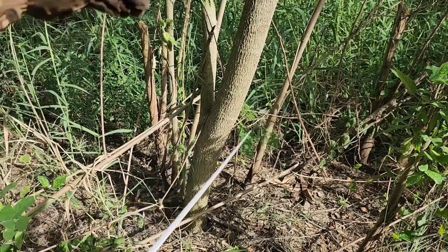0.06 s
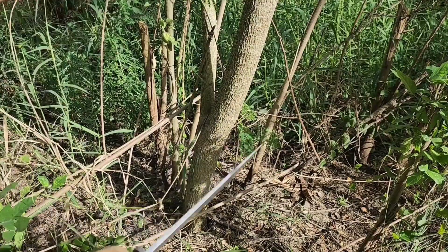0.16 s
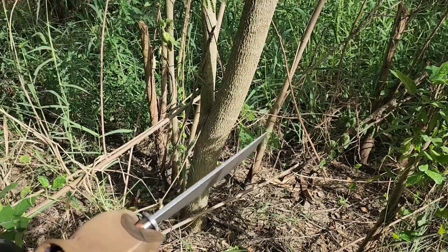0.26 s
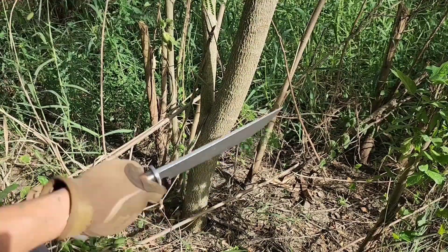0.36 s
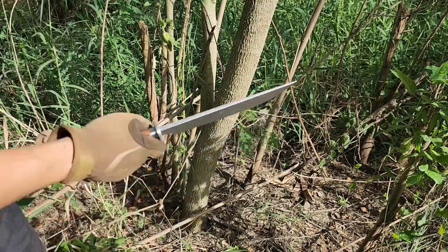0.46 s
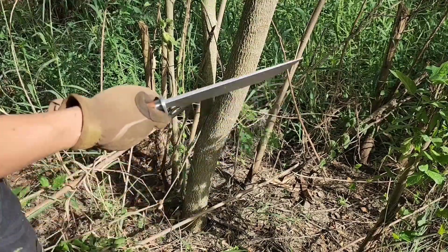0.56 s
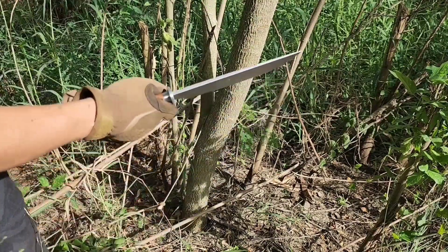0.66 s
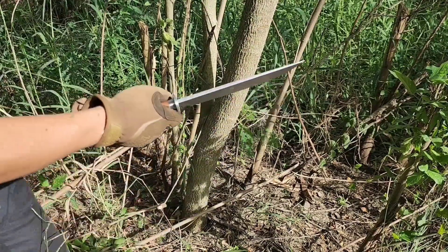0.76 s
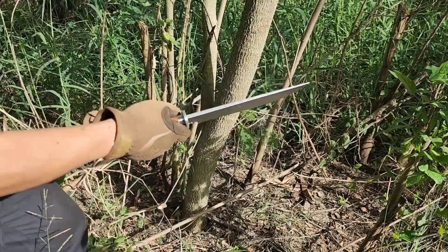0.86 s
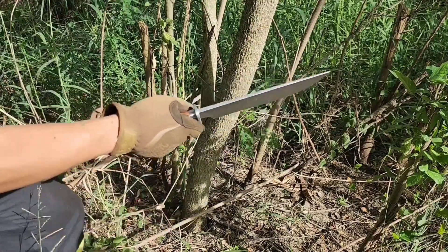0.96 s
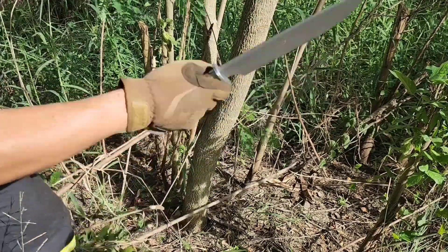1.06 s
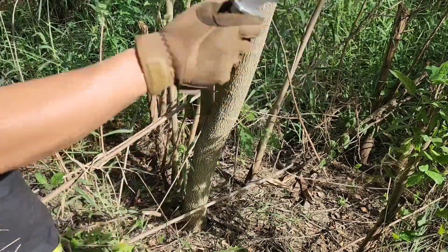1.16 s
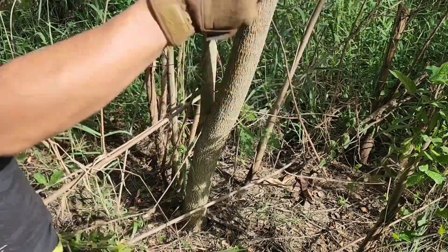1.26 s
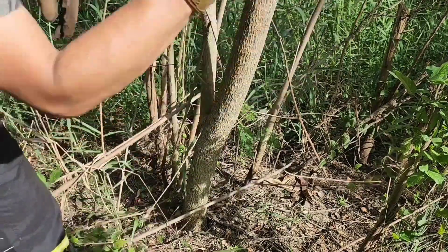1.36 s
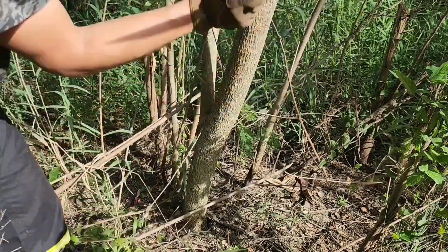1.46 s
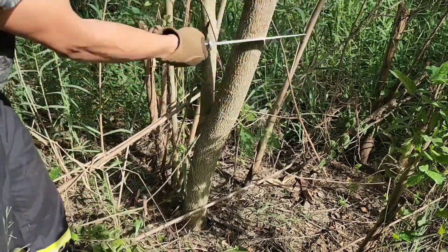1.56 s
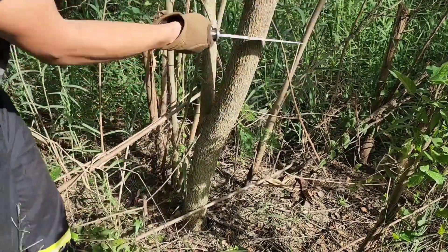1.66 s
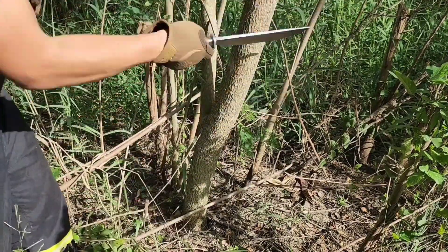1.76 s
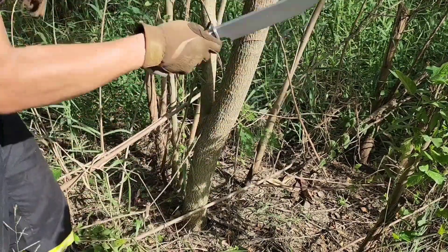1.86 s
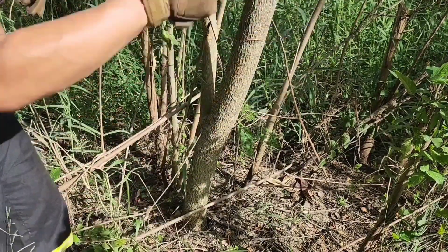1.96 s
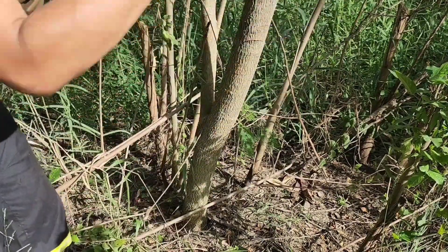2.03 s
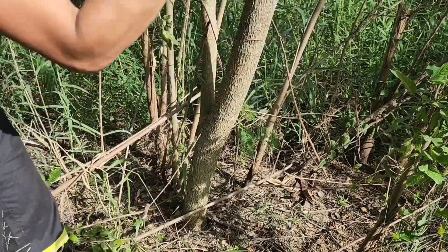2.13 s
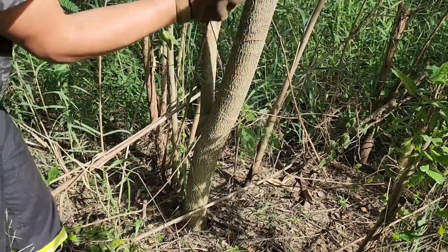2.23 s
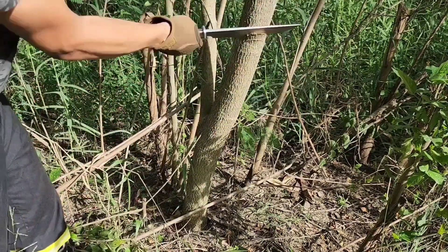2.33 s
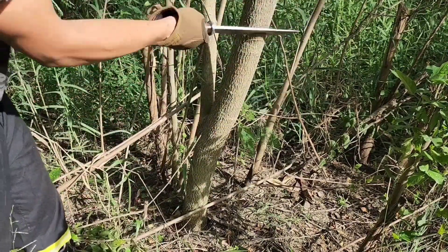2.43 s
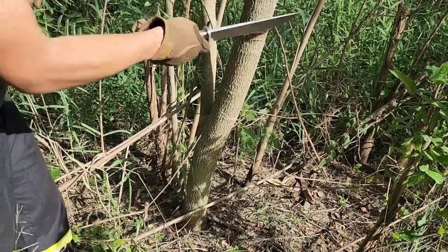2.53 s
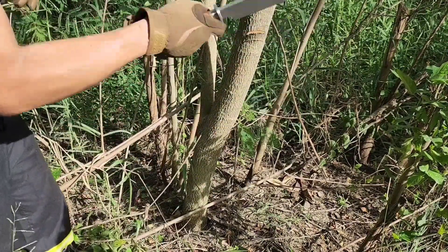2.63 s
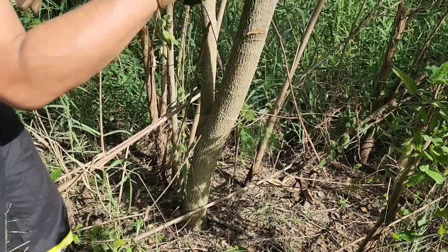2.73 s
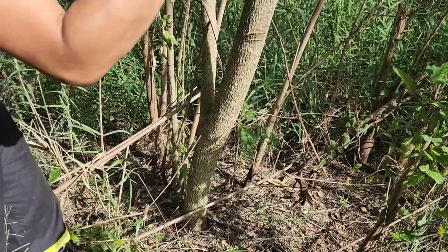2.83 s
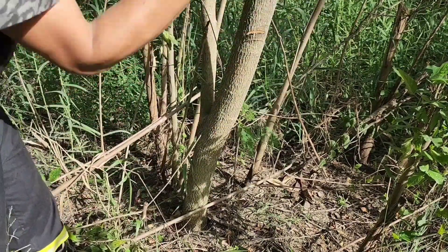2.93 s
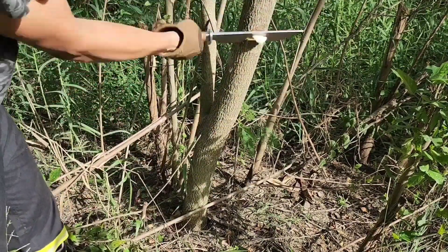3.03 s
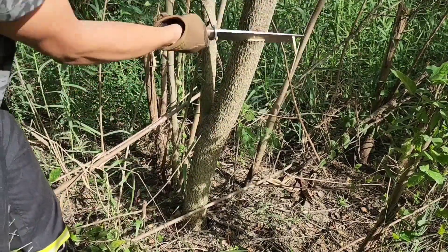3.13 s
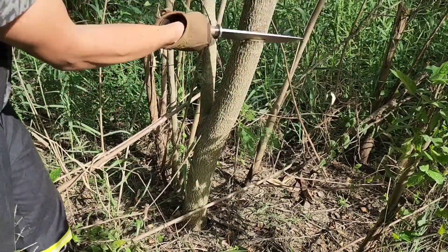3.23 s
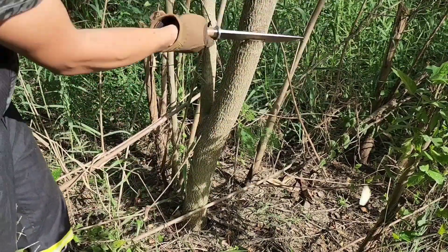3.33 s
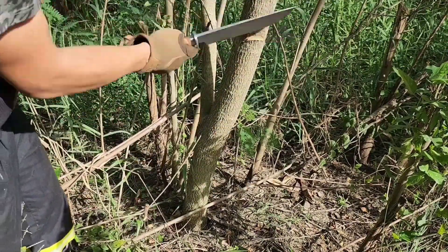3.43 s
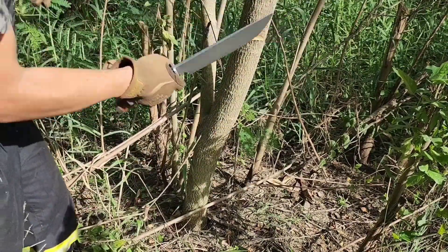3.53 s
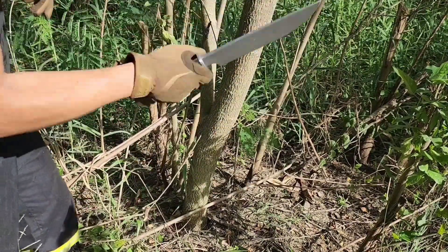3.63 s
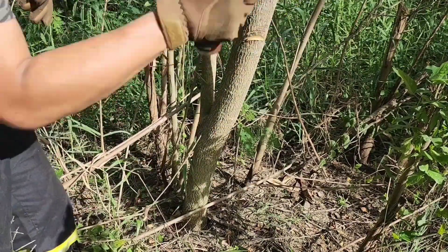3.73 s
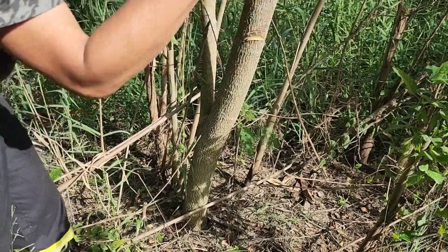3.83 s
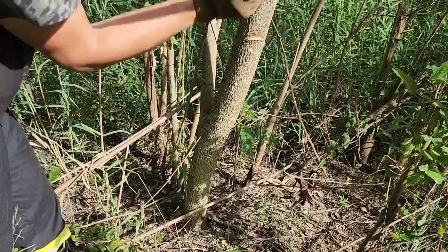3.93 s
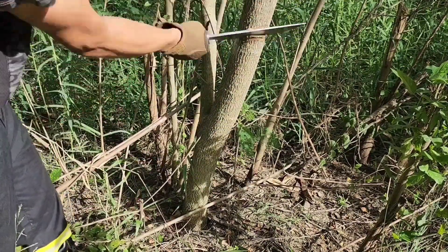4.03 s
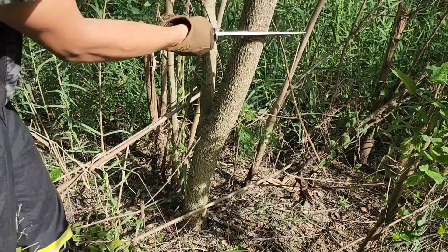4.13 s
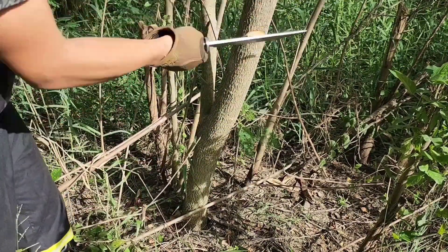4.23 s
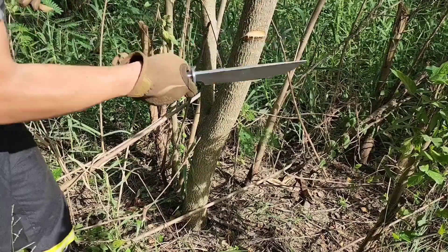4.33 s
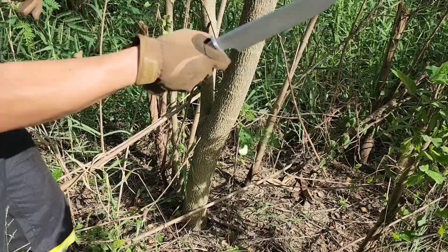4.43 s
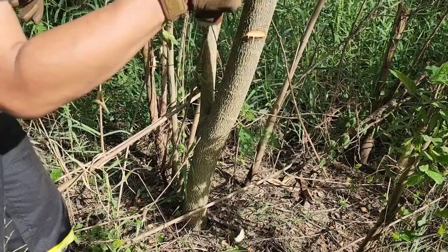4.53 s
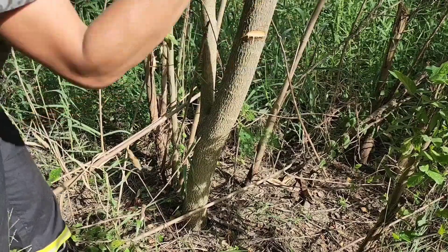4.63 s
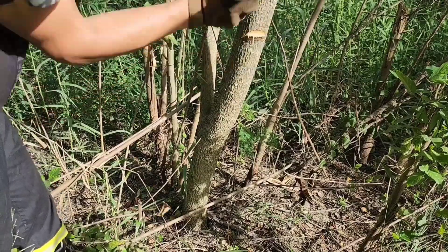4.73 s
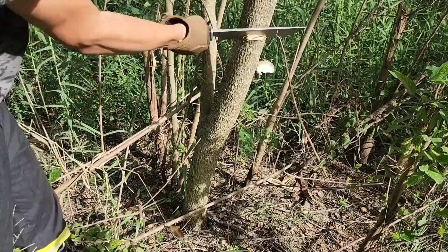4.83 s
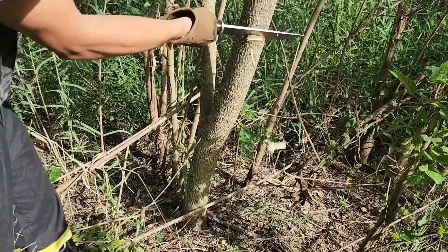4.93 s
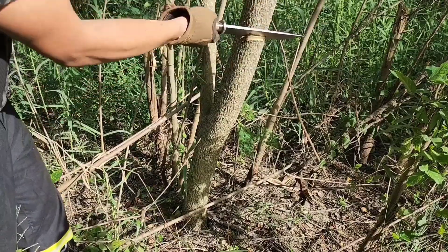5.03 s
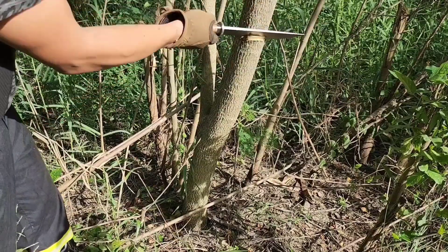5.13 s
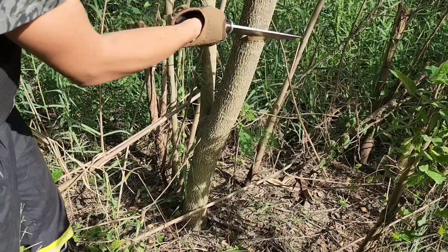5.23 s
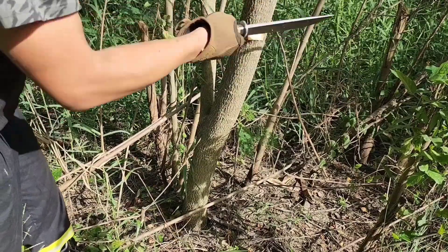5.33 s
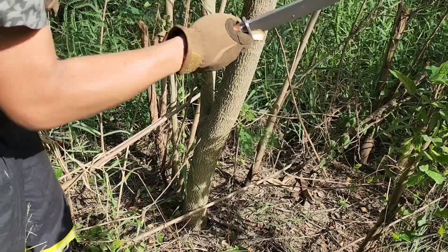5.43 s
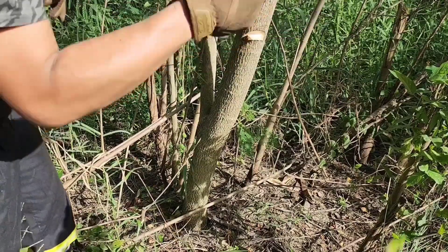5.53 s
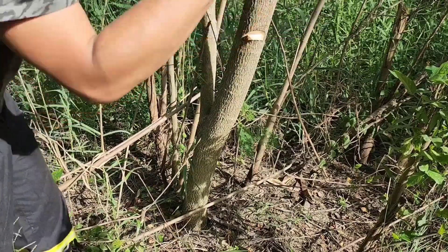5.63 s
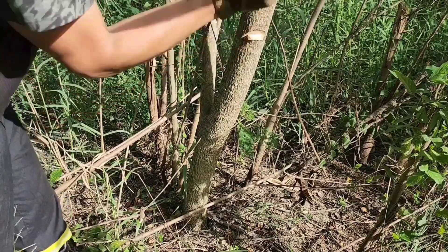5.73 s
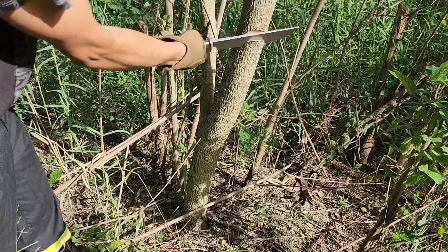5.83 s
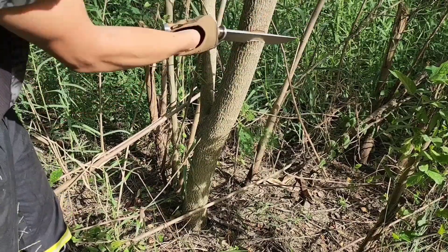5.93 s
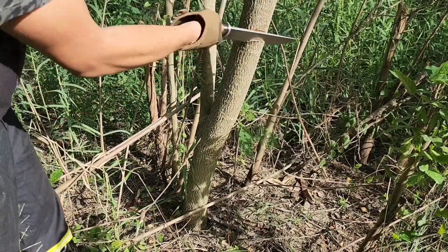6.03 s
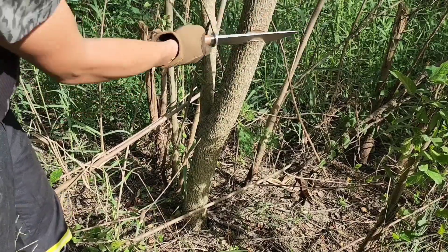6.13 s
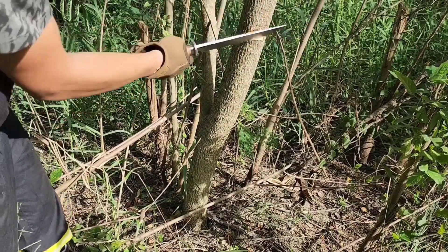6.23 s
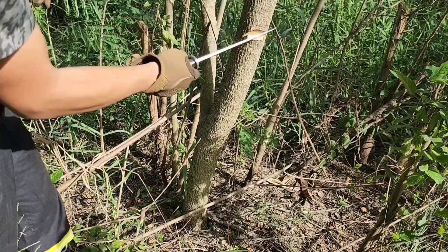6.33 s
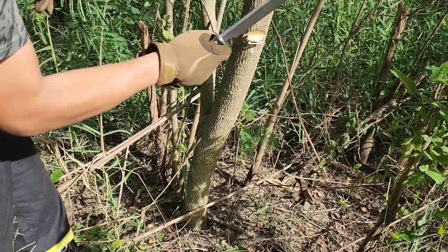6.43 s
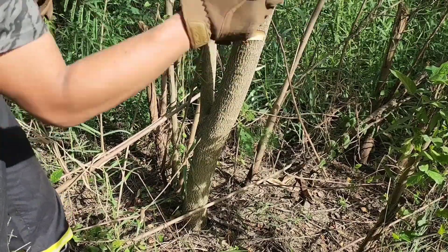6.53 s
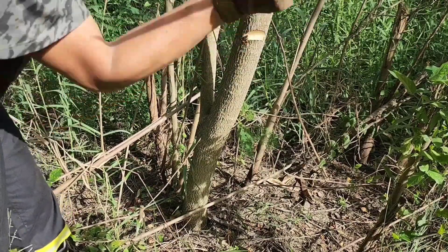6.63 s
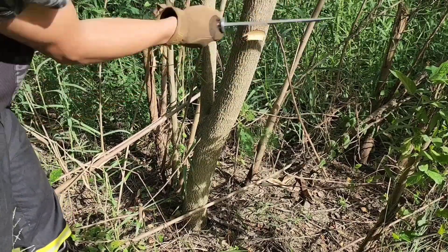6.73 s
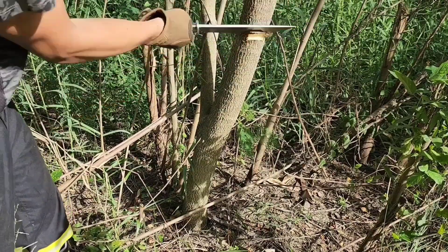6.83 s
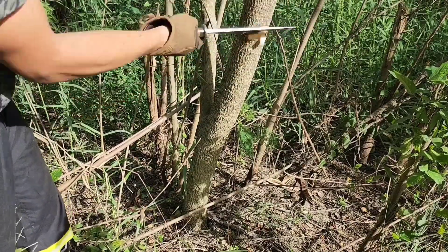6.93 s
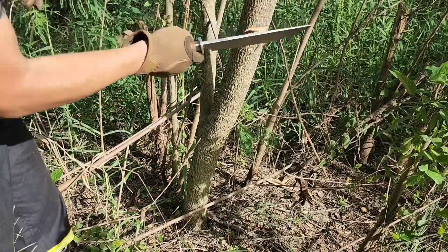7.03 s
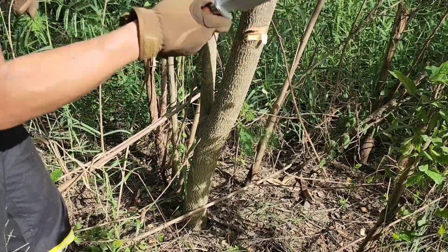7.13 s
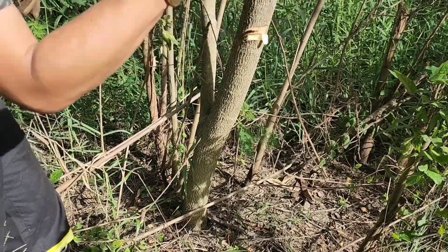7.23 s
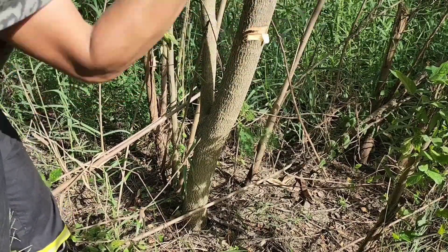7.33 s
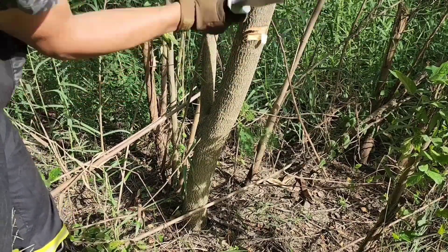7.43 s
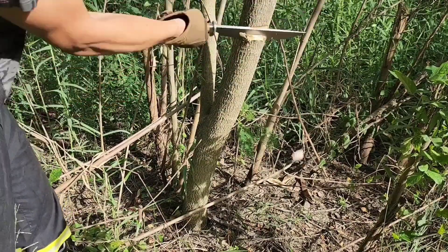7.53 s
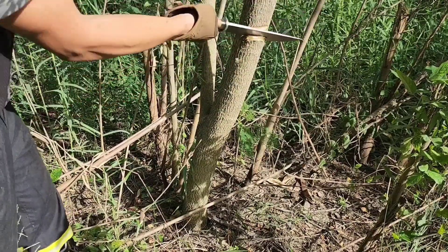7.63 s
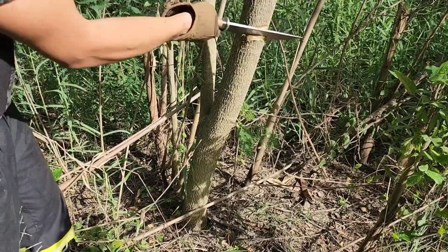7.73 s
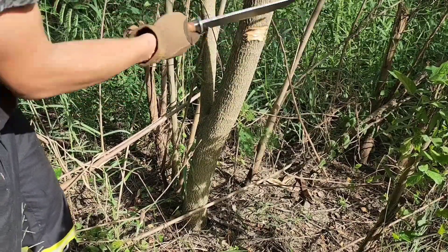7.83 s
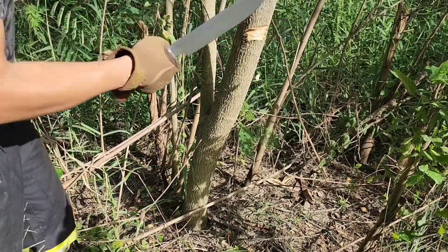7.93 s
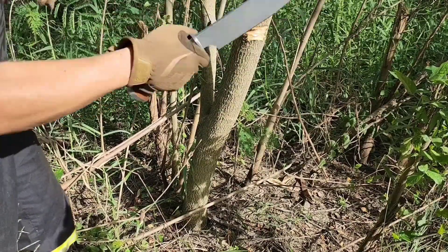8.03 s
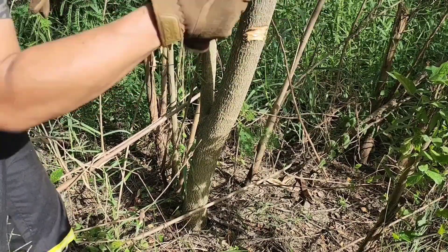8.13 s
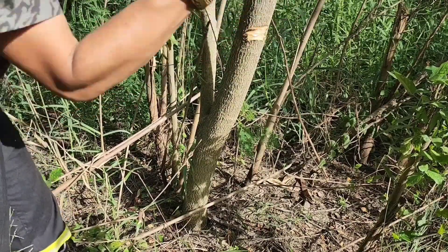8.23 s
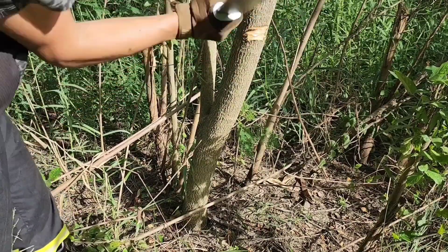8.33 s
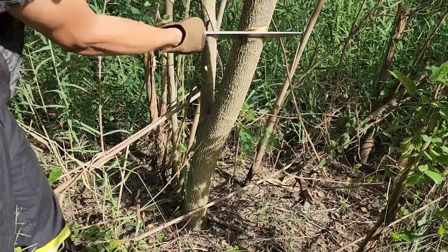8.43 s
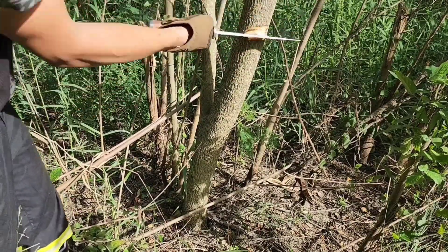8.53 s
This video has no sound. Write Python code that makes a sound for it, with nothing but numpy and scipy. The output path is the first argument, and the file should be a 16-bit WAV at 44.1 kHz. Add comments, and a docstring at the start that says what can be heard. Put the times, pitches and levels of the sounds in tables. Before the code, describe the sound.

In a wooded thicket, heard from about a metre away in stereo, dry leaves and stalks rustle from about 0.3 seconds as a big knife is picked up. Twigs snap at 0.3, 0.9 and 1.5 to 1.65, with tiny creaks. Nine chops into a green trunk follow at about 1.7, 2.5, 3.2, 4.2, 5.0, 6.0, 6.9, 7.7 and 8.6 seconds. The first is duller; the rest crack more brightly. Each is very short: tearing wet fibres, a hard mid-pitched wooden knock, a low stem thump, a trace of damped steel and a quick diffuse echo. Chips tick down between blows, clearest around 4.8 and 5.4, with slight leaf shakes. Quiet small birds give rising chirps and steep falling calls throughout, with occasional thin whistles. Underneath are a low distant engine, weaker from 3.5 to 6.7, faint far whirring, airy hiss and an insect trill.

```python
"""A big knife chops nine times into a green trunk about a metre away: torn fibres, knocking wood, stem thump.
Near sounds are noise bursts and damped modes, scattered by the thicket.
Dry litter rustles first, as the knife is picked up; twigs snap, stalks creak and chips patter (shaped noise).
Small birds (swept sines) call over a far engine (three harmonics), whirrs, open air and an insect trill."""
import sys
import numpy as np
from scipy import signal
from scipy.fft import rfft, irfft
from scipy.io import wavfile

SR = 44100
rng = np.random.default_rng(int(sys.argv[2]) if len(sys.argv) > 2 else 0)


def transcribe(signal):
    """Save signal, clipped to [-1, 1], as a 16-bit WAV file at the path in sys.argv[1]."""
    frames = np.atleast_2d(signal).T
    limited = np.clip(frames, -1, 1)
    pcm = np.round(limited * 32767).astype(np.int16)
    wavfile.write(sys.argv[1], SR, pcm)


N = 378819
T = np.arange(N) / SR
HIT = T[:8192]  # time axis of one short sound [s]

# Blows: (time [s], relative knock level [dB], crack level [dB], splinter level [dB], crack centre [Hz],
# bite time scale [s], delay of wedge stop [s], favoured wood pitch [Hz], dull jolt level [dB],
# splinter tilt [dB/octave])
CHOPS = [(1.724, -17.5, -26, -28, 2230, 0.0026, .0035, 1310, -13.5, -10),
         (2.4651, -19.5, -18.5, -21, 3350, 0.002, 0.0048, 734, -30, -6.5),
         (3.2173, -17, -15.5, -24.5, 3333, 0.0033, .0039, 1590, -20.5, -5.5),
         (4.1793, -16, -17.5, -19, 3930, 0.0032, .0041, 1500, -18, 1.5),
         (4.9654, -16, -19.5, -27, 3670, 0.0023, .0066, 2000, -20, 8),
         (5.99, -19, -17, -23.5, 3500, 0.0017, .0034, 800, -24, 2),
         (6.933, -19.5, -15.5, -17.5, 3440, .0019, .004, 2000, -35.5, 1.5),
         (7.6531, -17, -21.5, -19, 3500, 0.0027, 0.0039, 794, -22.5, 0),
         (8.5637, -22, -20.5, -20.5, 5100, 0.0009, 0.0044, 464, -23, -0.5)]
# Trunk with the blade held in it: (frequency [Hz], level [dB], t60 [s])
WOOD_MODES = [(487, -5.5, 0.029), (553, -10.5, 0.016), (635, -6, 0.031), (762, 2.5, 0.029),
              (844, -4, 0.031), (1061, -4.5, 0.02), (1096, -9.5, 0.031), (1322, 0, 0.038),
              (1536, -8, 0.021), (1662, -0.5, 0.021), (1967, 1.5, 0.016), (2122, -2.5, 0.039),
              (2297, -11.5, 0.023)]
# Bending of the whole stem: (frequency [Hz], level [dB], t60 [s])
STEM_MODES = [(82.6, -6.5, 0.12), (149.5, -13, 0.12), (208, -8.5, 0.059), (287, 2.5, 0.027),
              (328.7, -1, 0.072)]
# Steel blade, damped by cut and grip: (frequency [Hz], level [dB], t60 [s])
BLADE_MODES = [(1970, -5, 0.022), (3130, 0.5, 0.04), (4060, -12.5, 0.042), (4420, -7, .06),
               (6470, -9, 0.051), (7480, -9, 0.13), (7860, -8, 0.13), (11850, -7.5, 0.064),
               (12640, -11.5, .07)]
# Splintering fibres before tilt: (frequency [Hz], gain [dB])
SPLINTER_COLOUR = [(1500, -35), (4000, -6.5), (5500, -10.5), (7300, 1), (9500, -7.5), (12000, -1.5),
                   (16000, -11)]
# Wet wood giving way: (frequency [Hz], gain [dB])
CRUSH_COLOUR = [(20, -31.5), (60, -14), (200, -5.5), (290, -2.5), (380, -2.5), (600, -1), (1400, -2),
                (2100, -4), (3000, -30), (8000, -42.5)]
BLOW_S = 0.01  # reference length for burst energy; also the lead-in of a chop
THUMP_DB = -5  # thump against the mean of knock and jolt

# Echoes off ground, stems and leaves: (frequency [Hz], gain [dB])
THICKET_COLOUR = [(100, -6.5), (300, -5), (780, -7.5), (1500, -8), (3500, -3), (7000, -0.5), (16000, 1)]

# Rustling leaves and stalks: (frequency [Hz], gain [dB])
LITTER_COLOUR = [(180, -33.5), (300, -2), (725, -4.5), (946, -7), (1150, -3.5), (2250, -6), (5430, -1),
                 (7570, 0.5), (9090, -4.5), (15200, 0.5), (16000, -38.5)]
# Bright snap: (frequency [Hz], gain [dB])
SNAP_COLOUR = [(300, -55), (1200, 2), (2500, -2.5), (4500, 2), (8000, 0), (11000, 0), (16000, -3)]
# Dull tap: (frequency [Hz], gain [dB])
TAP_COLOUR = [(150, -1), (400, 3), (1100, -3.5), (2000, -5.5), (5000, -29)]
# Litter stirred as the knife is picked up and raised: (time [s], level [dB])
RUSTLE = [(0, -55), (.24, -56), (.34, -38.5), (.43, -44.5), (.52, -42.5), (.67, -52), (.76, -45.5),
          (.85, -51.5), (.91, -31.5), (.97, -42.5), (1.08, -47.5), (1.39, -39.5), (1.47, -52.5),
          (1.66, -45), (1.84, -47), (2.3, -66)]
SETTLE_DB_PER_S = 29.5  # fall after the last RUSTLE row
# Leaves shaken by a blow or brushed by its chips: (time of peak [s], level [dB])
SHAKES = [(3.62, -57), (4.3, -63.5), (5.55, -55.5), (6.15, -61.5), (6.6, -63), (7.12, -60), (7.84, -55.5)]
SHAKE_RISE_S, SHAKE_FADE_S = 0.14, 0.26  # exponential time constants
# Twigs, handling, bigger chips: (time [s], snap level [dB], tap level [dB], fade time constant [s])
TICKS = [(.260, -42.5, -44, .003), (0.322, -36.5, -39.5, 0.0032), (.344, -31, -37, 0.015),
         (.516, -39, -45.5, 0.0049), (.798, -37.5, -49, .002), (.893, -28.5, -33.5, .014),
         (.935, -26, -43, 0.0026), (1.305, -34.5, -49, 0.009), (1.404, -33, -42.5, 0.0023),
         (1.526, -25, -49.5, .003), (1.624, -24.5, -45.5, 0.0021), (1.643, -25.5, -33, .003),
         (2.688, -50.5, -70, .003), (3.752, -46, -69, .008), (3.999, -50.5, -66.5, .004),
         (4.845, -35, -51.5, 0.0034), (5.366, -28.5, -45.5, .003), (5.468, -50, -45, 0.0021),
         (5.564, -42, -58, 0.014), (7.075, -44.5, -70, .004), (7.107, -40.5, -60, 0.0023),
         (7.498, -51, -60, .0025), (7.596, -43.5, -66, .003), (7.803, -41.5, -58, 0.0016),
         (8.202, -44, -62, 0.0024), (8.433, -38.5, -64, 0.0042)]
# Stalks creaking together: (time [s], frequency [Hz], level [dB])
CREAKS = [(0.437, 1260, -45), (1.145, 2165, -48), (1.402, 1420, -48), (1.528, 2590, -37)]
# Faint chips: mean snap level, +/- scatter, tap against snap; flight range, fade time constant
CHIP_DB, CHIP_SCATTER_DB, CHIP_TAP_DB = -55.5, 1.5, -15.5
CHIP_FLIGHT_S, CHIP_FADE_S = (0.12, 0.64), 0.004

# Rising calls: (time [s], level [dB])
UPSLURS = [(.21, -58), (.656, -61), (2.18, -70), (3.122, -62.5), (3.518, -64.5), (4.10, -65), (4.521, -66),
           (5.13, -62.5), (5.657, -60), (6.048, -64), (6.485, -64), (6.83, -62), (7.31, -66), (7.95, -66),
           (8.31, -66.5)]
# Steep falling calls, each answered by the low note: (time [s], level [dB])
DOWNSLURS = [(2.405, -53.5), (2.865, -56.5), (3.38, -60), (3.779, -58.5), (4.76, -55), (5.205, -56),
             (6.15, -58.5), (6.61, -60), (7.17, -64), (7.58, -57.5), (8.112, -59.5)]
# Note shapes: (length [s], start [Hz], end [Hz])
UPSLUR, DOWNSLUR, LOW_NOTE = (0.095, 2880, 3600), (0.066, 5750, 3400), (0.06, 3270, 3010)
LOW_NOTE_AFTER_S, LOW_NOTE_DB = 0.11, -65
# Thin whistles: (time of peak [s], half length [s], pitch [Hz], final droop [Hz], level [dB])
WHISTLES = [(2.82, .14, 6980, 60, -70), (6.258, .055, 11500, 1402, -62), (6.432, .06, 8250, 0, -64),
            (7.247, 0.16, 6940, 0, -55.5)]
WHISTLE_FADE_DB = 17  # drop from the middle to either end

# Far engine: (time [s], firing rate [Hz], level [dB])
ENGINE = [(0, 59.53, -52.5), (.9, 59, -49), (2, 64, -46.5), (3.15, 65.83, -47), (3.5, 66, -64.5),
          (6.7, 60.56, -60.5), (7.1, 60.33, -48), (7.8, 60.73, -51), (8.59, 62.83, -45.5)]
# Harmonics of the firing rate: (multiple, level [dB])
ENGINE_ORDERS = [(1, 0), (2, -4.5), (3, -15)]
# Far whirrs: (centre [Hz], curve of (time [s], level [dB]))
WHIRRS = [(500, [(0, -69.5), (1.2, -56.5), (2.5, -64.5), (5, -72.5), (8.59, -61)]), (1510, [(0, -70),
          (2.3, -60.5), (4, -77), (7.75, -69.5), (8, -58), (8.59, -53.5)]), (1890, [(0, -86.5), (7.5, -73),
          (8.45, -54), (8.59, -56)])]
# Open air: (frequency [Hz], gain [dB])
AIR_COLOUR = [(12, -59.5), (20, -15.5), (68, -0.5), (107, -3.5), (142, -6), (187, -11), (210, -21),
              (301, -23.5), (923, -30.5), (1400, -29.5), (2460, -34), (2990, -33.5), (4060, -35),
              (8180, -41), (16000, -44.5)]
AIR_DB = -50
TOP_HZ = 16150  # recorder cutoff


def chopping():
    """All blows; the louder the knock and jolt, the louder the thump of the bending stem."""
    out = np.zeros((2, N))
    for time_s, knock_db, crack_db, splinter_db, crack_hz, bite_s, stop_s, wood_hz, jolt_db, tilt_db in CHOPS:
        thump_db = (knock_db + jolt_db) / 2 + THUMP_DB
        stroke = chop(knock_db, thump_db, crack_db, splinter_db, crack_hz, bite_s, stop_s,
                      wood_hz, jolt_db, tilt_db, BLOW_S)
        add(out, stroke, time_s - BLOW_S)
    return out


def chop(knock_db, thump_db, crack_db, splinter_db, crack_hz, bite_s, stop_s, wood_hz, jolt_db, tilt_db, lead_s):
    """The edge tears in, then wedges to a stop; both jolts ring the wood."""
    t = HIT - lead_s
    count = len(t)
    entered = np.clip(1 + t / (4.8 * bite_s), 0, 1)
    bite = np.exp(np.minimum(t / (0.24 * bite_s), -t / (1.08 * bite_s)))
    tearing = entered * (bite + 0.15 * np.exp(-np.abs(t - stop_s) / 0.0045))

    crack = band(fractures(count, 1.4, -7) * tearing, crack_hz, 1.76)
    crack = band(crack, crack_hz, 0.5)
    tilted = [(hz, db + tilt_db * np.log2(hz)) for hz, db in SPLINTER_COLOUR]
    splinter = colour(fractures(count, 4.4, 0) * tearing, tilted)
    blade = excite(tearing * fractures(count, 1, -1.7), ring(BLADE_MODES, uneven_db=-2))

    # the wedge seats, then stops dead: two short pushes on the trunk
    seat = np.exp(-((t - 0.0008) / 0.000078) ** 2)
    stop = np.exp(-((t - 0.0008 - stop_s) / 0.00016) ** 2)
    jolts = seat + 0.51 * stop
    favoured = [(hz, db + 5.5 * np.exp(-(np.log2(hz / wood_hz) / 0.36) ** 2), t60_s)
                for hz, db, t60_s in WOOD_MODES]
    knock = excite(jolts + 0.02 * tearing * fractures(count, 1.2, 0), ring(favoured, uneven_db=3))

    giving_way = np.clip(t / 0.001, 0, 1) * np.exp(-np.abs(t - 0.003) / 0.0074)
    crush = colour(fractures(count, 3.37, -8) * giving_way, CRUSH_COLOUR)
    push = np.exp(-((t - 0.002) / 0.00093) ** 2)  # the stem feels only the slow part of the force
    thump = excite(push, ring(STEM_MODES, uneven_db=5.5))
    jolt = colour(jolts, CRUSH_COLOUR)

    bright = blow(crack, crack_db) + blow(splinter, splinter_db) + blow(blade, splinter_db - 9)
    dull = blow(knock, knock_db - 1.5) + blow(crush, knock_db - 4.5)
    return bright + dull + blow(jolt, jolt_db) + blow(thump, thump_db)


def ring(modes, uneven_db):
    """Damped modes; every cut lands elsewhere, so it weights and shifts them anew."""
    out = np.zeros(len(HIT))
    for k, (hz, db, t60_s) in enumerate(modes):
        weight, shift = rng.standard_normal(2)
        fade = np.exp(-np.log(1000) * HIT / t60_s)
        tone = np.sin(2 * np.pi * hz * (1 + 0.0098 * shift) * HIT)
        out += (-1) ** k * undb(db + uneven_db * weight) * fade * tone
    return out


def fractures(count, uneven_db, side_db):
    """Dense tiny breaks of very unequal size."""
    sizes = undb(uneven_db * np.minimum(rng.exponential(size=count), 6))
    return spread(rng.standard_normal((2, count)) * sizes, side_db)


def scatter(x, early_s, late_s, late_db, wet_db, direct, size=20000):
    """Ground, stems and leaves throw back a quick wash and a faint long one."""
    t = T[:size]
    fade = np.exp(-t / early_s) + undb(late_db) * np.exp(-t / late_s)
    fade *= np.clip((t - 0.003) / 0.0013, 0, 1)
    echoes = colour(spread(rng.standard_normal((2, size)), 0.5) * fade, THICKET_COLOUR)
    echoes *= undb(wet_db) / np.sqrt(np.sum(echoes ** 2) / 2)
    return direct * x + excite(x, echoes)


def litter():
    """Stalks rustle, crackle and creak as they are stirred; twigs snap and chips land."""
    sparse = (rng.random(N) < 80 / SR) * undb(4 * np.minimum(rng.exponential(size=N), 3))  # 80 breaks/s
    breaks = excite(sparse, np.exp(-HIT / 0.001))  # each break sets off a short flurry of fibres
    grain = fractures(N, 3.5, -1) * (1 + 1.5 * breaks)
    out = unit(colour(grain, LITTER_COLOUR)) * stirring() * undb(1.3 * walk(40))
    for time_s, snap_db, tap_db, fade_s in TICKS + chips(count=1):
        swell = 1 - np.exp(-HIT / (0.62 * fade_s))  # long scuffs also start softly
        burst = fractures(len(HIT), 2.7, -0.5) * np.exp(-HIT / fade_s) * swell
        snap = blow(colour(burst, SNAP_COLOUR), snap_db)
        tap = blow(colour(burst.mean(0), TAP_COLOUR), tap_db)
        add(out, snap + tap, time_s - 0.001)
    for time_s, hz, db in CREAKS:
        slips = fractures(len(HIT), 2.3, -4.5) * np.exp(-HIT / 0.0047)
        creak = band(band(slips, hz, 3.9), hz, 3.9)
        add(out, blow(creak, db), time_s)
    return out


def stirring():
    """Leaf motion as amplitude: powers of the handling and of short swells add up."""
    handled_db, = curves(RUSTLE)
    settled_db = SETTLE_DB_PER_S * np.maximum(T - RUSTLE[-1][0], 0)
    power = undb(handled_db - settled_db) ** 2
    for peak_s, db in SHAKES:
        swell = np.exp(np.minimum((T - peak_s) / SHAKE_RISE_S, (peak_s - T) / SHAKE_FADE_S))
        power = power + (undb(db) * swell) ** 2
    return np.sqrt(power)


def chips(count):
    """Small chips land after a random flight from each blow: rows like those of TICKS."""
    rows = []
    for time_s, *_ in CHOPS:
        for flight, size in rng.random((count, 2)):
            lands_s = time_s + np.interp(flight, (0, 1), CHIP_FLIGHT_S)
            db = CHIP_DB + CHIP_SCATTER_DB * (2 * size - 1)
            if lands_s < T[-1]:
                rows.append((lands_s, db, db + CHIP_TAP_DB, CHIP_FADE_S))
    return rows


def birds():
    """Rising calls and falling calls with a low answer, blurred by the trees between; thin dry whistles."""
    out, waver, flutter = np.zeros(N), walk(200), walk(70)
    notes = [(s, db, *UPSLUR) for s, db in UPSLURS]
    notes += [(s, db, *DOWNSLUR) for s, db in DOWNSLURS]
    notes += [(s + LOW_NOTE_AFTER_S, LOW_NOTE_DB, *LOW_NOTE) for s, _ in DOWNSLURS]
    for time_s, db, length_s, start_hz, end_hz in notes:
        u = np.linspace(0, 1, int(length_s * SR))
        now = int(time_s * SR) + np.arange(len(u))
        hz = start_hz + (end_hz - start_hz) * (u + 0.11 * waver[now])
        level = undb(db + 4.9 * flutter[now]) * np.sqrt(2 * np.abs(np.sin(np.pi * u)))
        add(out, level * np.sin(2 * np.pi * np.cumsum(hz) / SR), time_s)
    out = colour(out, [(2800, -0.5), (3700, 0.5), (4500, -4), (6000, -7)])  # leaves soak up the highest notes
    out = scatter(out, early_s=0.04, late_s=0.18, late_db=-12, wet_db=0, direct=0.45)
    for peak_s, half_s, top_hz, droop_hz, db in WHISTLES:
        hz = top_hz - droop_hz * np.clip((T - peak_s) / half_s, 0, 1) ** 2
        hz = hz * (1 + 0.0025 * walk(54))
        swell = undb(db - WHISTLE_FADE_DB * (np.abs(T - peak_s) / half_s) ** 1.2)
        out += swell * np.sqrt(2) * np.sin(2 * np.pi * np.cumsum(hz) / SR)
    return out


def engine():
    """A far engine hums on its lowest orders, wandering a little."""
    hz, db = curves(ENGINE)
    phase = 2 * np.pi * np.cumsum(hz * (1 + 0.007 * walk(14))) / SR
    out = np.zeros(N)
    for order, order_db in ENGINE_ORDERS:
        level = undb(db + order_db + 1.7 * walk(9))
        out += level * np.sqrt(2) * np.sin(order * phase)
    return out


def whirr(hz, levels):
    """A narrow, fluttering band of far machine noise: low-passed noise times a carrier."""
    db, = curves(levels)
    lowpass = signal.butter(2, 150, fs=SR, output="sos")
    flutter = signal.sosfilt(lowpass, spread(rng.standard_normal((2, N)), 2.3))
    return unit(flutter * np.sin(2 * np.pi * hz * T)) * undb(db)


def air():
    """Open air: rumble nearly alike at both ears, a wide leafy hiss that swells, a faint insect trill."""
    bass = spread(rng.standard_normal((2, N)), -15)
    treble = spread(rng.standard_normal((2, N)), -2)
    low, high = (signal.butter(2, 500, kind, fs=SR, output="sos") for kind in ("low", "high"))
    rumble = signal.sosfilt(low, bass) * undb(1.2 * walk(6.8))
    hiss = signal.sosfilt(high, treble) * undb(-1 + 1.23 * walk(8))
    trill_colour = [(7000, -47), (8200, -5.5), (8500, -2.5), (8800, -22), (9800, -51.5)]
    trill = unit(colour(rng.standard_normal((2, N)), trill_colour))
    return unit(colour(rumble + hiss, AIR_COLOUR)) * undb(AIR_DB) + trill * undb(-73 + 3.5 * walk(16))


def undb(db):
    """Decibels to gain."""
    return 10 ** (np.asarray(db) / 20)


def unit(x):
    """Scale to rms 1."""
    return x / np.sqrt(np.mean(x ** 2) + 1e-20)


def blow(x, db):
    """Give a short sound the energy of BLOW_S seconds at this level."""
    energy = np.mean(np.sum(x ** 2, axis=-1))
    return x * undb(db) * np.sqrt(BLOW_S * SR / energy)


def curves(rows):
    """Join the rows of a table by straight lines in time."""
    time_s, *columns = np.transpose(rows)
    return [np.interp(T, time_s, column) for column in columns]


def add(out, x, time_s):
    """Mix x in at this time."""
    i = max(int(time_s * SR), 0)
    out[..., i:i + x.shape[-1]] += x[..., :N - i]


def excite(force, response):
    """What an object gives off under this force: convolution."""
    full = signal.fftconvolve(np.atleast_2d(force), np.atleast_2d(response), axes=-1)
    return full[:, :force.shape[-1]]


def colour(x, points, size=4096):
    """Causal minimum-phase filter through (frequency [Hz], gain [dB]) points."""
    hz, db = np.transpose(points)
    grid_hz = np.fft.rfftfreq(size, 1 / SR) + 1  # +1 avoids log(0)
    gain = undb(np.interp(np.log(grid_hz), np.log(hz), db))
    cepstrum = irfft(np.log(gain))
    cepstrum[1:size // 2] *= 2
    cepstrum[size // 2 + 1:] = 0
    return excite(x, irfft(np.exp(rfft(cepstrum))))


def band(x, hz, q):
    """One broad resonance."""
    return signal.lfilter(*signal.iirpeak(hz, q, fs=SR), x)


def walk(rate_hz):
    """Slow chance with a spread near 1: random knots joined by lines."""
    knots = rng.standard_normal(int(N / SR * rate_hz) + 2)
    return np.interp(T * rate_hz, np.arange(len(knots)), knots)


def spread(pair, side_db):
    """Two unrelated signals as middle and side."""
    return pair[0] + undb(side_db) * pair[1] * np.array([[1], [-1]])


def scene():
    """Near sounds in the thicket, with the wood behind them."""
    near = scatter(chopping() + litter(), early_s=0.019, late_s=0.089, late_db=-18, wet_db=-10.5, direct=0.92)
    whirrs = sum(whirr(hz, levels) for hz, levels in WHIRRS)
    return near + birds() + engine() + whirrs + air()


def record(dry):
    """The recorder rounds the tallest peaks and cuts the top."""
    rounded = 1.355 * np.tanh(dry / 1.254)
    return signal.sosfilt(signal.ellip(10, 0.2, 70, TOP_HZ, fs=SR, output="sos"), rounded)


dry = scene()
out = record(dry)
transcribe(out)
```